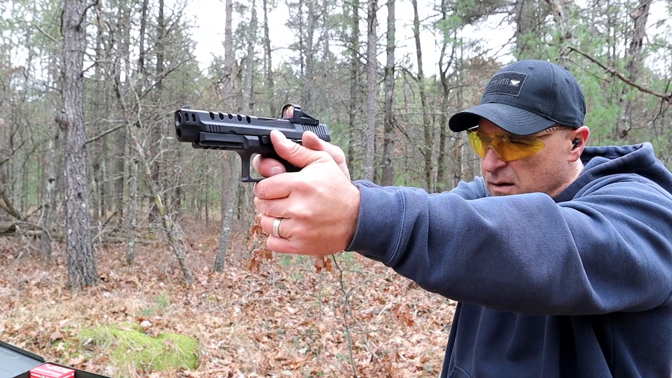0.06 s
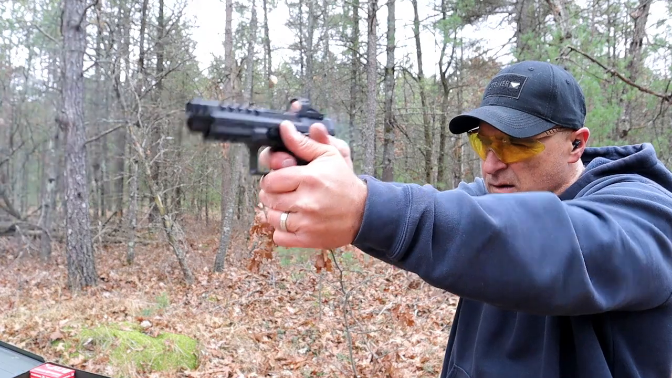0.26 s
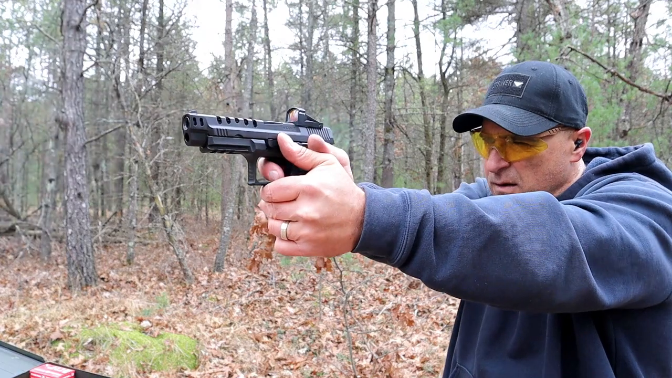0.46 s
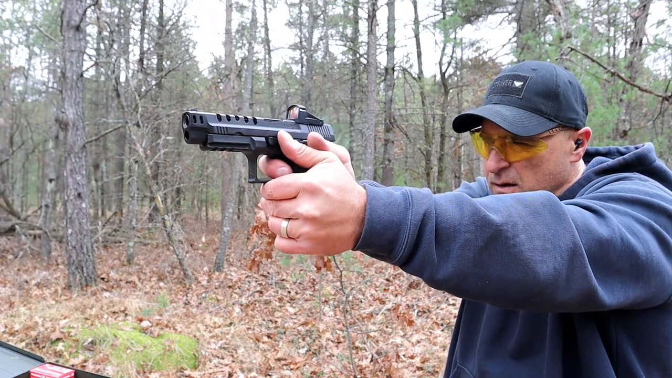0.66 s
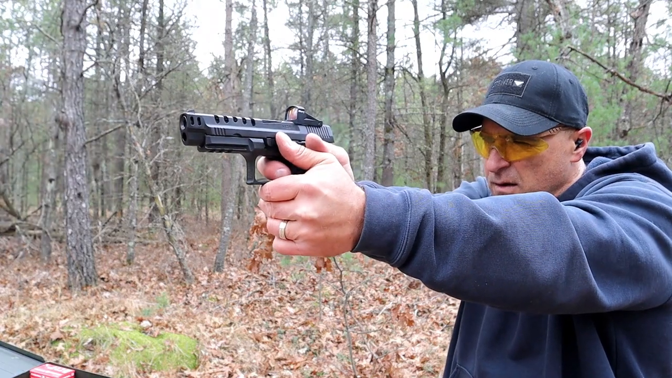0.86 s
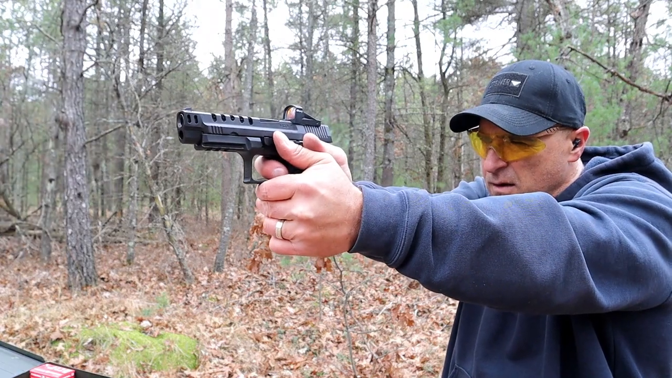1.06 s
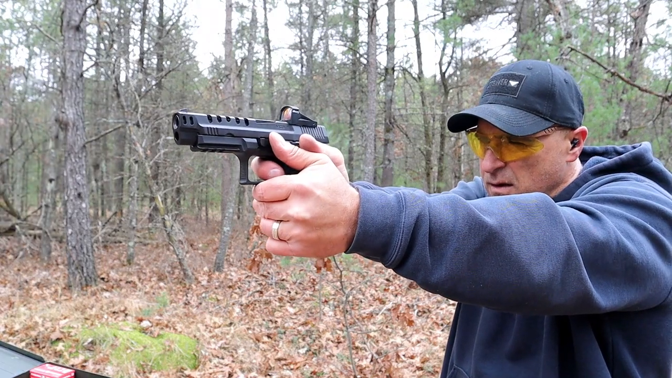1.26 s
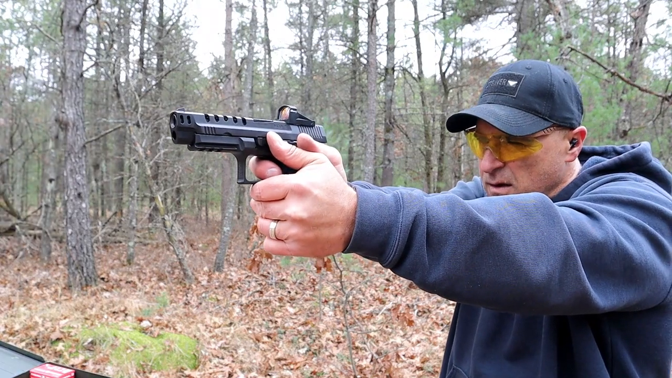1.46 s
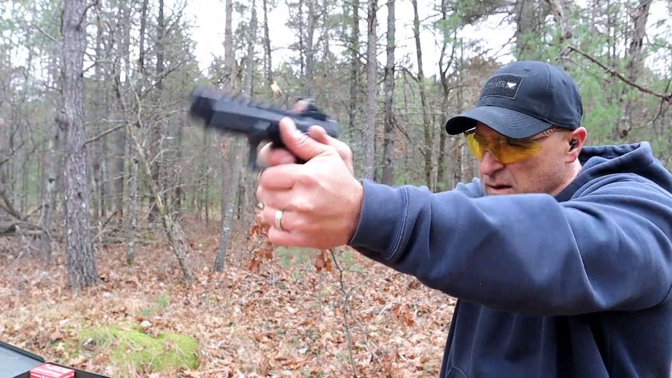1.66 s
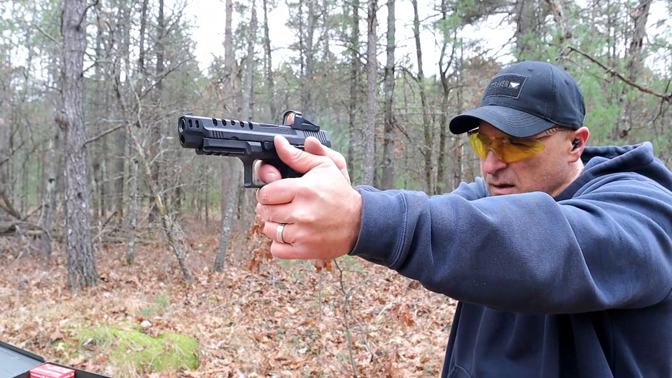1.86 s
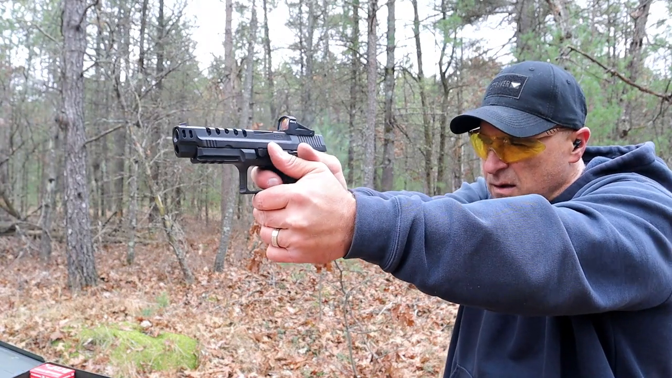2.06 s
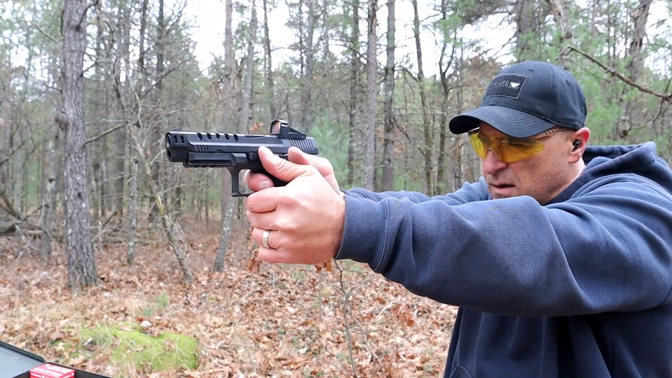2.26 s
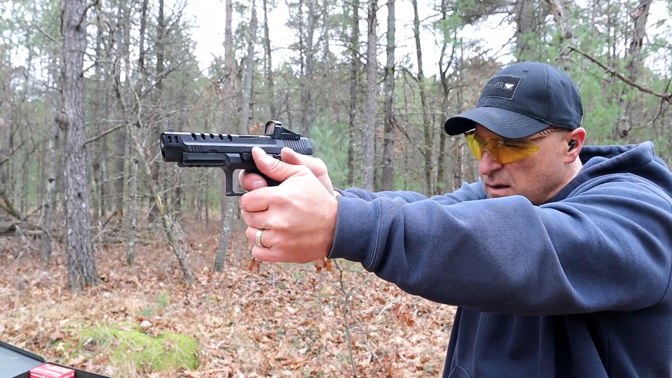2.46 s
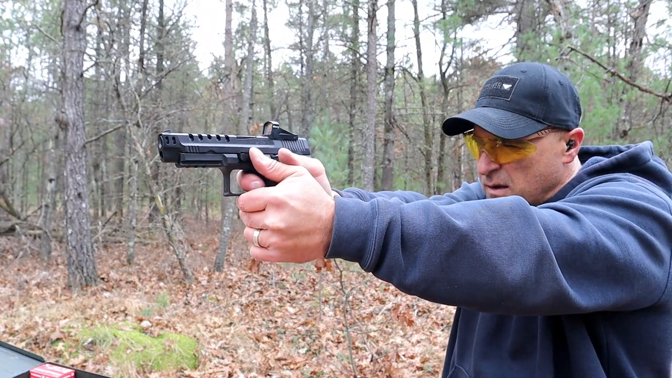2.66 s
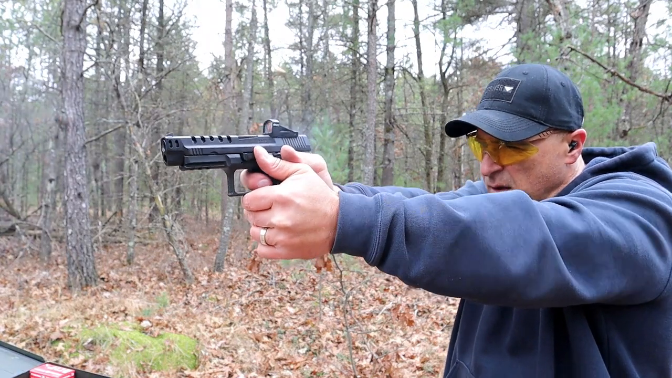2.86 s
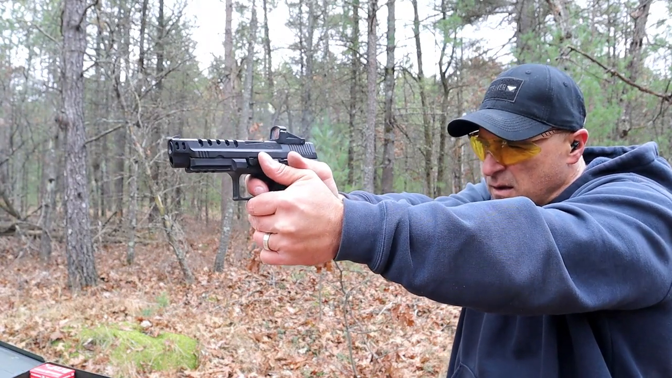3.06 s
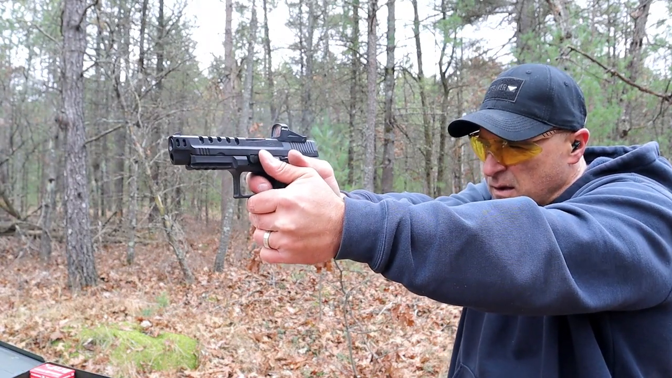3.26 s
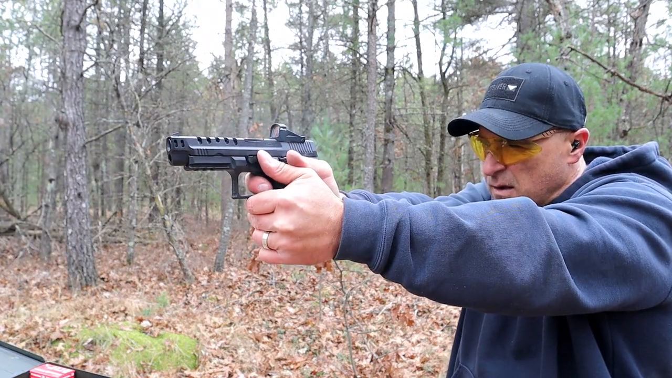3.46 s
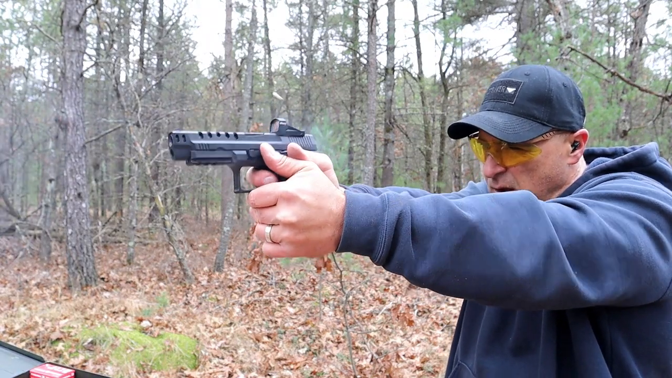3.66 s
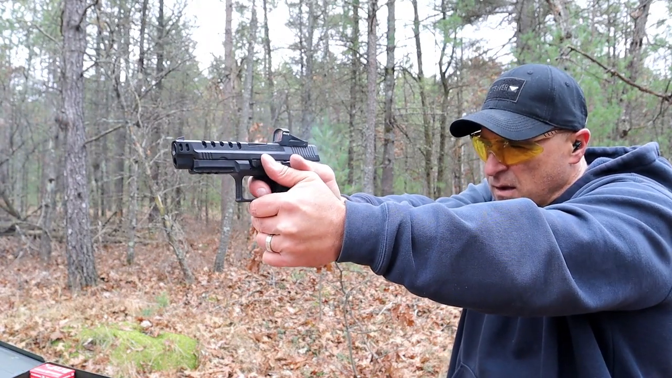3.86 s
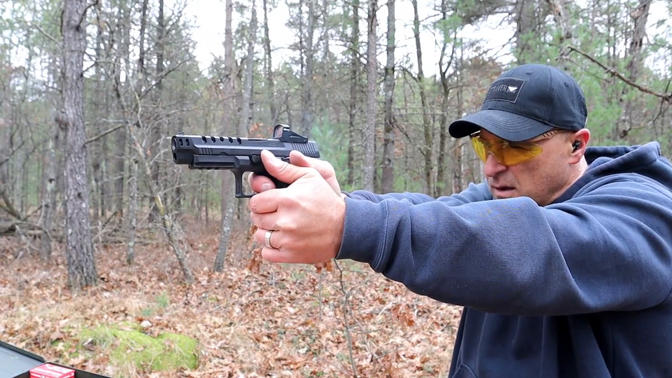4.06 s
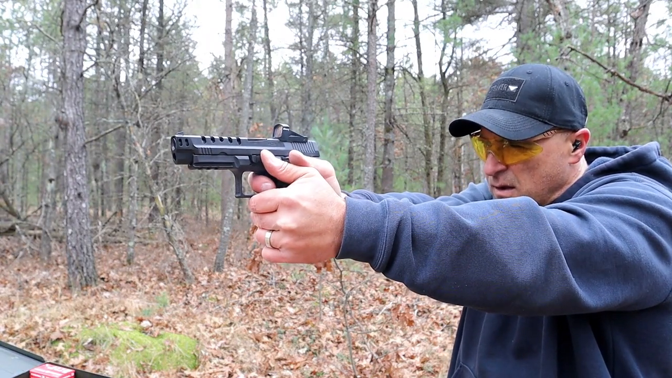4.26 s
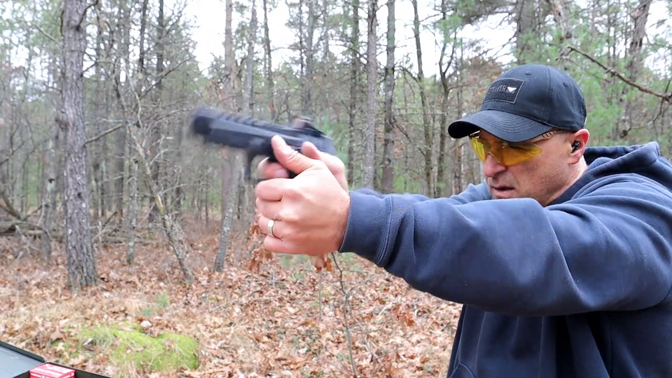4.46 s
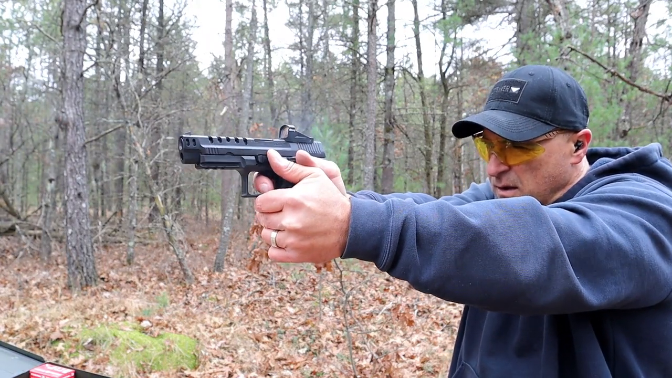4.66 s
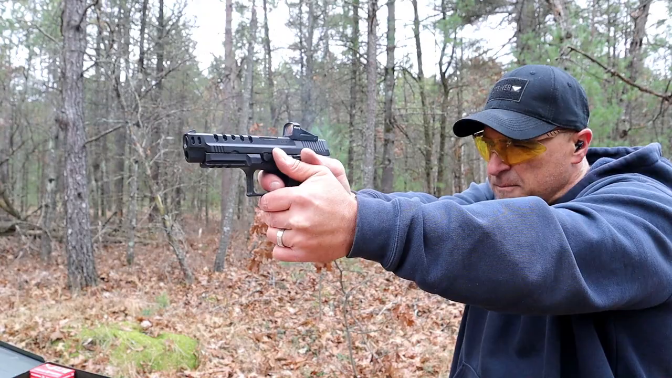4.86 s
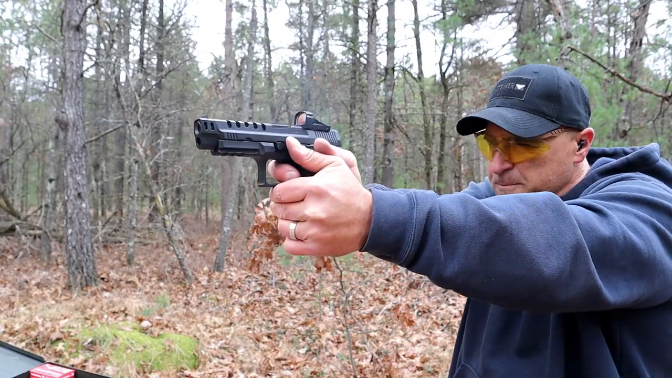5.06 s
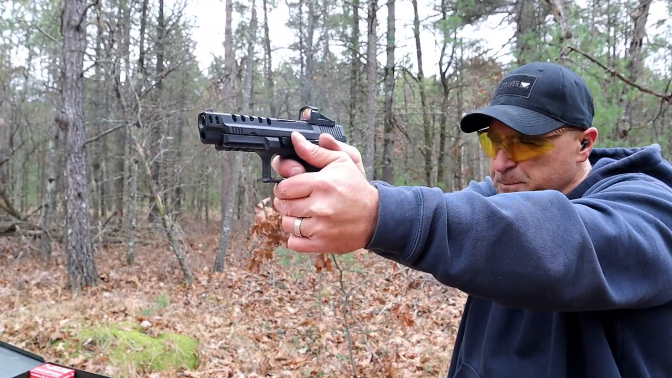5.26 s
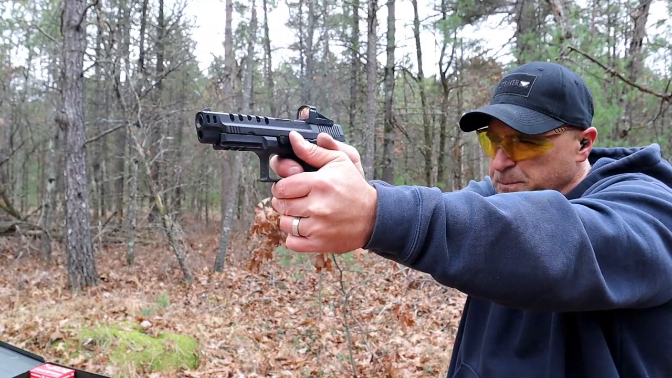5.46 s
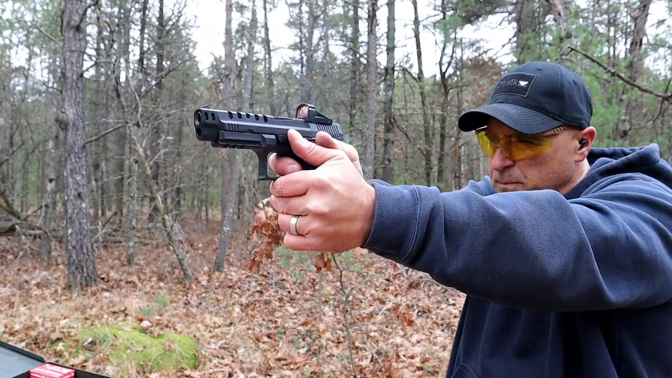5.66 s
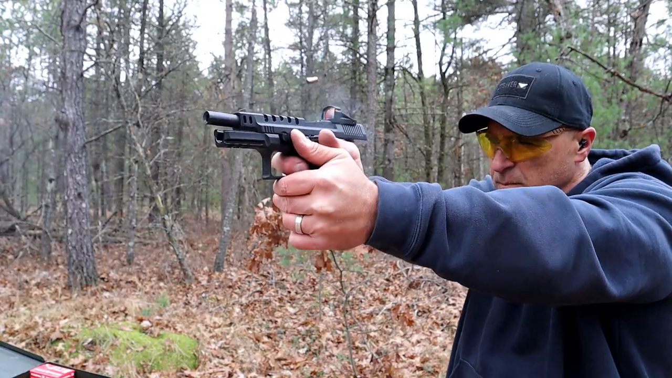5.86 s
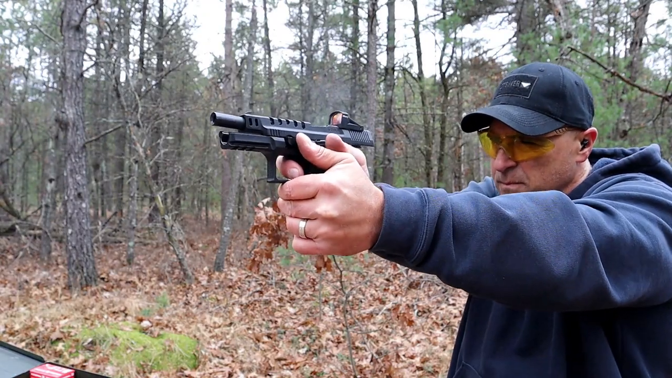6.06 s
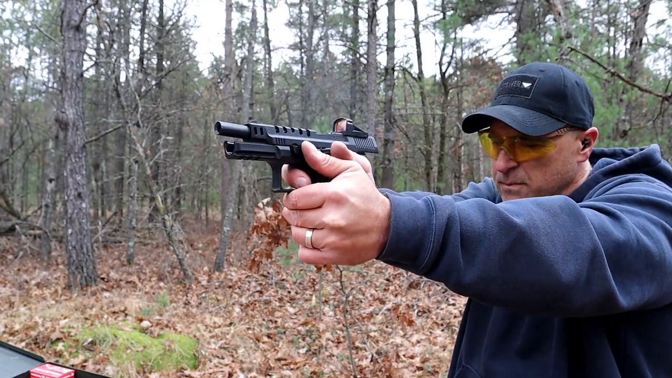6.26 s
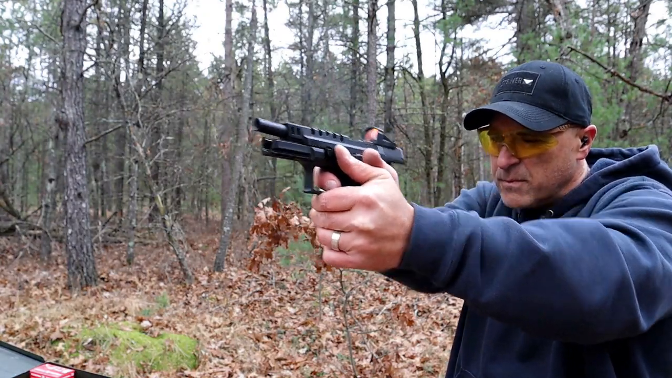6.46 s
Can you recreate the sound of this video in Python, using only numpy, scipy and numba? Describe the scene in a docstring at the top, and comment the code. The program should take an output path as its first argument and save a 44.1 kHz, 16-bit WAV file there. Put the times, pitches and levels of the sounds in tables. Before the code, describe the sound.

In open woodland, a pistol fires six times very close to the microphone, unevenly spaced. Each overloaded crack brings quick slaps off nearby trunks and a swelling forest echo. The second to fifth shots hit hung steel, which rings high and wavering. The slide clacks after each shot but the last, and spent cases rustle into dry leaves.

```python
"""Pistol and steel plates in a wood

A pistol close to the microphone fires six shots: noise bursts, pressure waves and a short hollow ring, answered
by slaps from the ground and near trunks and a swelling forest echo. Four hit one of two hung plates, left or
right, built from fluttering modes. The slide clacks and spent cases drop into dry leaves as coloured noise; a
far rumble grows under still air. The input overloads and its gain ducks, then creeps back."""
import sys
import numpy as np
from scipy import signal
from scipy.fft import rfft, irfft
from scipy.io import wavfile
from scipy.ndimage import uniform_filter1d
from numba import njit

SR = 44100
rng = np.random.default_rng(int(sys.argv[2]) if len(sys.argv) > 2 else 0)


def waveform_to_disk(signal):
    """Save audio, clipped to [-1, 1], as 16-bit WAV at the path in sys.argv[1]."""
    frames = np.transpose(np.atleast_2d(signal))
    scaled = np.clip(frames, -1, 1) * 32767
    samples = np.round(scaled).astype(np.int16)
    wavfile.write(sys.argv[1], SR, samples)


N = 286782
TIME = np.arange(N) / SR


# Six shots in the wood: (time [s], blast gain [dB], forest echo gain [dB], way the gun points)
SHOTS = [(.3040, 0.5, -0.36, "left"), (1.7191, -0.5, 0.24, "left"), (2.8683, 0.5, -1.5, "right"),
         (3.6846, 2, -3.15, "right"), (4.5285, 0.5, -3, "right"), (5.8750, 0, 1, "left")]
# Each line of fire: (delay of the echo from a near trunk [s], pitch ratio of the blast's ring)
AIMS = {"left": (.0678, 1), "right": (.0640, 1.035)}
EARLIER_SHOT_S = -1.3   # its echo is still dying away
GROUND_BOUNCE_S = .0036   # the pressure wave returns from the surface below the gun


def pistol(likeness=0.43, first_echo_s=0.027, first_echo_db=-2, direct_wave_db=-9, bounced_wave_db=-1):
    """Each shot sends out crack, blast and pressure wave, then slaps and forest echo return; the slide shuts."""
    out = np.zeros(N)
    common_blast, quick_waves = blast(), lead_in()
    add(out, EARLIER_SHOT_S, forest())
    for s, blast_db, echo_db, aim in SHOTS:
        slap_s, pitch = AIMS[aim]
        add(out, s - len(quick_waves) / SR, quick_waves)
        add(out, s, shock())
        # same gun, same place: the blasts are much alike
        mixed_blast = np.sqrt(likeness) * common_blast + np.sqrt(1 - likeness) * blast()
        add(out, s, from_db(blast_db) * mixed_blast)
        add(out, s, pressure_wave(direct_wave_db, push_s=.0007))
        add(out, s + GROUND_BOUNCE_S, pressure_wave(bounced_wave_db, push_s=0.0028))
        add(out, s + GROUND_BOUNCE_S, body_ring(pitch))
        add(out, s + first_echo_s, from_db(first_echo_db) * slap_echo())
        add(out, s + slap_s, slap_echo())
        add(out, s, from_db(echo_db) * forest())
    for s, *_ in SHOTS[:-1]:   # the slide slams shut after every round but the last
        add(out, s + .0504, slide())
    return out


def lead_in(hz=1900, level_db=-9):
    """A few quick, soft-edged waves heard just before each blast."""
    t = TIME[:2 ** 6]
    return from_db(level_db) * np.sin(2 * np.pi * hz * t) * np.sqrt(np.hanning(len(t)))


def shock(level_db=15, t60=0.0057):
    """The shock front: a bright crack in the first instant."""
    crack = noise([(500, -21), (3000, 1), (9000, -1.5), (16000, -7)], size=1024)
    return from_db(level_db) * crack * dying(TIME[:2 ** 10], t60)


# Muzzle blast: (frequency [Hz], relative density [dB per Hz], decay t60 [s])
BLAST = [(30, -15, 0.023), (92, -9, 0.082), (196, -5, .07), (443, -5.5, 0.09), (1120, 2.5, 0.049),
         (2010, -3, 0.042), (4000, -3, 0.043), (8200, -3, 0.036), (15800, -20, 0.034)]
# Scatter from ground and brush close by: (frequency [Hz], relative density [dB per Hz], decay t60 [s])
BRUSH = [(40, -27, .15), (180, -28.5, 0.19), (510, 2, 0.39), (1000, 3.5, 0.27), (2500, -13, 0.43),
         (6900, -13.5, 0.48), (11190, -9.5, 0.18), (16000, -26, 0.33)]


def blast(level_db=15, brush_db=-11):
    """A violent burst of noise, and scatter from close by, each band dying at its own rate."""
    burst = from_db(level_db) * fading_noise(BLAST, dying, size=16384)
    return burst + from_db(brush_db) * fading_noise(BRUSH, dying, size=16384)


def pressure_wave(level_db, push_s):
    """The expanding gas ball: a push, then a longer suck."""
    u = TIME[:2 ** 11] / push_s
    return from_db(level_db) * (1 - u) * np.exp(-u)


# Hollow resonances close to the microphone, set off by the blast:
# (frequency before the aim's pitch ratio [Hz], relative level [dB], decay t60 [s])
BODY = [(104, -3, 0.027), (188, -6, 0.049), (536, 3, 0.089), (1069, 3.5, 0.058)]


def body_ring(pitch, level_db=-3):
    """The short hollow ring that a blast leaves behind."""
    t = TIME[:2 ** 13]
    return sum(from_db(db + level_db) * np.sin(2 * np.pi * hz * pitch * t) * dying(t, t60)
               for hz, db, t60 in BODY)


# Slap off the ground or a near trunk: (frequency [Hz], relative density [dB per Hz])
SLAP_COLOUR = [(80, -35), (300, -12), (700, 0), (2500, 0), (5000, -8), (9000, -10), (15000, -24)]


def slap_echo(edge_db=-15.0, scatter_db=-9.5):
    """One short slap off the ground or a near tree: a sharp edge, and scatter that swells and dies."""
    t = TIME[:2 ** 11]
    scatter = from_db(scatter_db) * dying(t, .014) * (1 - dying(t, .005))
    edge = from_db(edge_db) * dying(t, 0.0057)
    return noise(SLAP_COLOUR, size=2048) * (scatter + edge)


# Echo from the wood at large:
# (frequency [Hz], relative density [dB per Hz], absorption after the crest [dB per s], crest time [s])
FOREST = [(30, -35.5, -2, 0.095), (70, -21.5, 15, 0.2), (164, -18, 13.5, 0.1), (226, -14.5, 2, 0.11),
          (365, -1, -0.5, 0.14), (614, 3, 0, 0.19), (990, 5, 0.5, 0.15), (1625, -2.5, 5.5, 0.16),
          (2090, -1.5, 11.5, 0.14), (3930, -11, 33, .16), (7060, -14, 69, 0.15), (9800, -19, 94, .155),
          (15000, -30, 139, 0.097)]


def forest(swell=4.6, spread=2.91, level_db=-16, grain_db=0.73, grain_s=.004):
    """Ever more trunks answer until the crest; then the echo thins by a power of time and by absorption."""
    def envelope(t, db_per_s, crest_s):
        u = t / crest_s
        power = 2 * u ** swell / (1 + u ** (swell + spread))
        return np.sqrt(power) * from_db(-db_per_s * np.maximum(t - crest_s, 0))
    t = TIME[:2 ** 17]
    # single trunks stand out of the crowd
    trunks = np.interp(t, grain_s * np.arange(2 ** 11), rng.standard_normal(2 ** 11))
    grain = rms_one(from_db(grain_db * trunks))
    return from_db(level_db) * grain * fading_noise(FOREST, envelope, size=len(t))


# The slide's clack: (frequency [Hz], relative density [dB per Hz], decay t60 [s])
SLIDE_COLOUR = [(100, -51.5, .02), (500, -2.5, 0.033), (2050, -2.5, 0.074), (5000, -22.5, .03),
                (8040, 13, 0.015), (12000, 1, 0.037), (16000, -9, 0.023)]


def slide(level_db=-12):
    """The slide slams shut: a short clack of noise whose bands die at their own rates."""
    return from_db(level_db) * fading_noise(SLIDE_COLOUR, dying, size=4096)


# Bullets on steel: (time the ring arrives [s], plate, spot on it, upper modes gain [dB],
# upper modes rise before plate() shortens it [s], shimmer level [dB])
HITS = [(1.800, "left", "first", 3.5, 0.13, -38), (2.966, "right", "first", 0, 0.037, -36),
        (3.765, "right", "second", -1, 0.074, -36), (4.586, "right", "third", 1, .035, -37)]
# Names of the spots, in the order of the plates' level columns
SPOTS = ["first", "second", "third"]
# Lowest mode frequencies of each plate, by side: [Hz]
LOW_MODES_HZ = {"left": [2066], "right": [2020, 3439]}
# Lowest modes, long and with broad lobes: (decay t60 [s], rise [s], first gap between lobes [s],
# gap spacing [s], depth of the gaps [dB], then relative level for each spot struck [dB])
LEFT_LOW_MODES = [(1.6, 0.082, .4, .34, -6, -14.5)]
RIGHT_LOW_MODES = [(1.13, 0.39, 0.17, .305, -16.5, 0.5, -2.5, -12.5),
                   (0.64, 0.22, 0.14, .26, -3, -0.5, -5, -20)]
# Upper modes: (frequency [Hz], decay t60 [s], then relative level for each spot struck [dB])
LEFT_PLATE = [(3381, .7, -26.5), (3530, .85, -30), (3860, .8, -29.5), (4753, 0.8, -38), (5231, 0.48, -14.5),
              (5959, 0.64, -21.5), (7165, .7, -34), (8263, 0.6, -39), (9292, .9, -41), (10885, .6, -38),
              (11558, 0.56, -35), (13600, .6, -50), (14200, .55, -48)]
RIGHT_PLATE = [(3752, 0.79, -27, -25, -42.5), (4646, 0.7, -49, -39.5, -31), (5127, 0.86, -23, -17.5, -31),
               (5785, 1, -41, -31, -26), (6137, 0.68, -41, -46, -29), (7028, 0.79, -22.5, -17.5, -27.5),
               (8025, .58, -20.5, -26, -23), (8349, 0.49, -21, -26.5, -23.5),
               (9113, 0.56, -20.5, -17, -23.5), (9631, 0.56, -45, -40.5, -36), (10490, 0.91, -38, -25, -28),
               (11137, .8, -20.5, -25.5, -23.5), (11370, 0.86, -40.5, -29.5, -50),
               (13141, .68, -28.5, -39, -41), (13795, .6, -32.5, -40, -45), (14056, .55, -32.5, -38, -40.5),
               (14368, .55, -42, -38, -41)]


def targets():
    """Each hit sets the low modes, the upper modes and the shimmer of one of two steel plates ringing."""
    out = np.zeros(N)
    plates = {"left": (LEFT_LOW_MODES, LEFT_PLATE), "right": (RIGHT_LOW_MODES, RIGHT_PLATE)}
    for s, side, spot, upper_db, rise_s, shimmer_db in HITS:
        low, upper = plates[side]
        strike = SPOTS.index(spot)
        add(out, s, low_ring(LOW_MODES_HZ[side], low, strike))
        add(out, s, plate(upper, strike, upper_db, rise_s))
        add(out, s, shimmer(shimmer_db))
    return out


def low_ring(pitches, modes, strike, scatter=.16):
    """A plate's lowest modes bloom and fade as its swing carries their lobes past."""
    t, out = TIME[:2 ** 16], 0
    for hz, (t60, rise_s, first_gap_s, every_s, gap_db, *strike_db) in zip(pitches, modes):
        lobes = np.hypot(np.sin(np.pi * (t - first_gap_s) / every_s), from_db(gap_db))
        envelope = (1 - np.exp(-t / rise_s)) * lobes * dying(t, t60)
        out = out + from_db(strike_db[strike]) * envelope * fluttering(hz, t, scatter)
    return out


def plate(modes, strike, level_db=0, rise_s=0.087, swing_depth=0.37, scatter=0.97):
    """The upper modes of a hung plate; it swings and sweeps their lobes past."""
    t, out = TIME[:2 ** 16], 0
    for hz, t60, *strike_db in modes:
        lobes_hz = rng.uniform(1.94, 5.3) * np.sqrt(hz / 2000)   # higher modes have narrower lobes
        swing = 1 + swing_depth * np.sin(2 * np.pi * (lobes_hz * t + rng.random()))
        rise = 1 - np.exp(-(t / (rise_s * rng.uniform(0.67, 0.68))) ** 2)
        tone = fluttering(hz, t, scatter, flutter_hz=22.15)
        out = out + from_db(strike_db[strike] + level_db) * rise * swing * tone * dying(t, t60)
    return out


def shimmer(level_db, t60=0.43, tilt_db=-6, count=22):
    """A crowd of weak high modes, fainter by the octave."""
    pitches = rng.uniform(6000, 15000, count)
    modes = []
    for hz in pitches:
        mode_db = level_db + tilt_db * np.log2(hz / pitches.mean()) + rng.normal(0, 3.9)
        modes.append((hz, t60, mode_db))
    return plate(modes, strike=0)


def fluttering(hz, t, scatter, flutter_hz=16):
    """A tone plus its many paths through the trees, which add with wandering phase."""
    knots = np.arange(t[0], t[-1] + 1, 1 / (2 * flutter_hz))
    draws = rng.standard_normal((2, 2 ** 10))
    in_step, across = [scatter * np.interp(t, knots, draw[:len(knots)]) for draw in draws]
    return (1 + in_step) * np.sin(2 * np.pi * hz * t) + across * np.cos(2 * np.pi * hz * t)


# Spent cases landing about three quarters of a second after their shots:
# (time [s], level before the case trim [dB], decay t60 [s])
CASES = [(1.058, -33.5, .12), (2.5408, -37.5, .27), (3.657, -31.5, .26), (4.4307, -37.5, .14),
         (5.282, -36.5, .12)]
# Other small crackles in the leaves: (time [s], level [dB], decay t60 [s])
LEAVES = [(.129, -58, .12), (.709, -46, .06), (1.289, -55, 0.28), (1.449, -60, .19), (1.569, -61, .13),
          (1.653, -58, 0.093), (2.304, -50, 0.068), (2.735, -54.5, .054), (5.599, -54, .1),
          (5.733, -54.5, .16)]


def ground(case_trim_db=-7):
    """Spent cases drop into the leaves, which also crackle now and then; one dull thud."""
    out = np.zeros(N)
    for s, db, t60 in CASES:
        add(out, s, from_db(db + case_trim_db) * crackle(t60))
    for s, db, t60 in LEAVES:
        add(out, s, from_db(db) * crackle(t60))
    add(out, 2.424, thud())
    return out


def thud(hz=205, level_db=-29):
    """A dull thud: a narrow band of low noise that swells and dies."""
    t = TIME[:2 ** 13]
    band = noise([(hz / 2, -25), (hz, 0), (hz * 2, -25), (hz * 10, -70)], size=len(t))
    return from_db(level_db) * band * dying(t, .08) * (1 - dying(t, .03))


# Dry leaf litter: (frequency [Hz], relative density [dB per Hz])
LEAF_COLOUR = [(800, -16), (2000, 2.5), (4000, -1), (8000, -2), (13000, -5.5), (16000, -12.5)]


def crackle(t60, grain_db=4):
    """Dry leaves give way in a dying run of tiny snaps."""
    t = TIME[:2 ** 13]
    snaps = rms_one(from_db(grain_db * np.repeat(rng.standard_normal(2 ** 7), 2 ** 6)))
    return snaps * noise(LEAF_COLOUR, size=len(t)) * dying(t, t60)


def leaf_ticks(level_db=-65, spread_db=5, t60=.025, count=90):
    """Faint stray ticks in the leaf litter, at random times and levels."""
    out, t = np.zeros(N), TIME[:2 ** 11]
    for s in rng.uniform(0, N / SR, count):
        tick = noise(LEAF_COLOUR, size=len(t)) * dying(t, t60)
        add(out, s, from_db(level_db + rng.normal(0, spread_db)) * tick)
    return out


# Far rumble: (frequency [Hz], relative density [dB per Hz])
RUMBLE_COLOUR = [(20, -13), (50, -14.5), (80, 1), (130, -1.5), (250, -21.5), (600, -38.5), (3000, -75)]
# Still air: (frequency [Hz], relative density [dB per Hz])
AIR = [(100, -9.5), (700, -3.5), (2000, -17), (5000, -21.5), (10000, -24.5), (15000, -39)]


def background(air_db=-63, rumble_start_db=-81, rumble_growth_db_per_s=4):
    """Steady noise of still air, and a far rumble that draws steadily nearer."""
    rumble_db = rumble_start_db + rumble_growth_db_per_s * TIME
    rumble = from_db(rumble_db) * noise(RUMBLE_COLOUR, size=N)
    return rumble + from_db(air_db) * noise(AIR, size=N)


def from_db(db):
    """Amplitude ratio of a level in dB."""
    return 10 ** (np.asarray(db) / 20)


def rms_one(x):
    """Scale a signal to rms 1."""
    return x / np.sqrt(np.mean(x ** 2) + 1e-20)


def at_hz(table, hz, axis=1):
    """A column of a table, read on a log-frequency axis."""
    table = np.array(table, float)
    return np.interp(np.log(np.maximum(hz, 1)), np.log(table[:, 0]), table[:, axis])


def dying(t, t60):
    """Exponential decay by 60 dB in t60 seconds."""
    return np.exp(-np.log(1000) * t / max(t60, 1e-3))


def add(out, s, sound):
    """Mix a sound in from time s on, keeping what falls inside."""
    i = round(s * SR)
    part = sound[max(-i, 0):len(out) - i]
    out[max(i, 0):max(i, 0) + len(part)] += part


def noise(colour, size):
    """Steady noise of a given spectrum, rms 1."""
    hz = np.fft.rfftfreq(size, 1 / SR)
    spectrum = rfft(rng.standard_normal(size))
    return rms_one(irfft(spectrum * from_db(at_hz(colour, hz)), size))


def fading_noise(table, envelope, size):
    """Coloured noise whose bands each follow an envelope set by the table's later columns."""
    spectrum, t = rfft(noise(table, size)), np.arange(size) / SR
    log_hz = np.log(np.fft.rfftfreq(size, 1 / SR) + 1)
    centres = np.log([row[0] for row in table])
    out = np.zeros(size)
    for row, one_band in zip(table, np.eye(len(table))):
        share = np.interp(log_hz, centres, one_band)   # neighbouring bands crossfade
        out += irfft(spectrum * share, size) * envelope(t, *row[2:])
    return out


def scene():
    """All sources as they reach the microphone, one channel."""
    return (pistol() + targets() + ground() + leaf_ticks() + background())[None]


@njit
def ducking(over_db, attack_step, release_step):
    """Gain reduction in dB slews up while the level is over the limit, and creeps back after."""
    out, cut = np.zeros(len(over_db)), 0.
    for i in range(len(over_db)):
        cut = max(0., cut + min(attack_step, max(over_db[i] - cut, -release_step)))
        out[i] = cut
    return out


def record(dry, limit_db=-8, attack_db_per_s=380, release_db_per_s=90, ceiling=0.83, cutoff_hz=15900):
    """The input overloads, gain control ducks what gets through, and the top is cut."""
    clipped = ceiling * dry[0] / (1 + np.abs(dry[0]) ** 12) ** (1 / 12)
    mean_square = uniform_filter1d(clipped ** 2, size=128)
    level_db = 10 * np.log10(2 * mean_square.clip(1e-12))   # a full-scale sine reads 0 dB
    cut_db = ducking(level_db - limit_db, attack_db_per_s / SR, release_db_per_s / SR)
    low_pass = signal.ellip(10, .1, 70, cutoff_hz, fs=SR, output="sos")
    out = signal.sosfilt(low_pass, clipped * from_db(-cut_db))
    return np.clip(out, -1, 1)[None]


dry = scene()
out = record(dry)
waveform_to_disk(out)
```